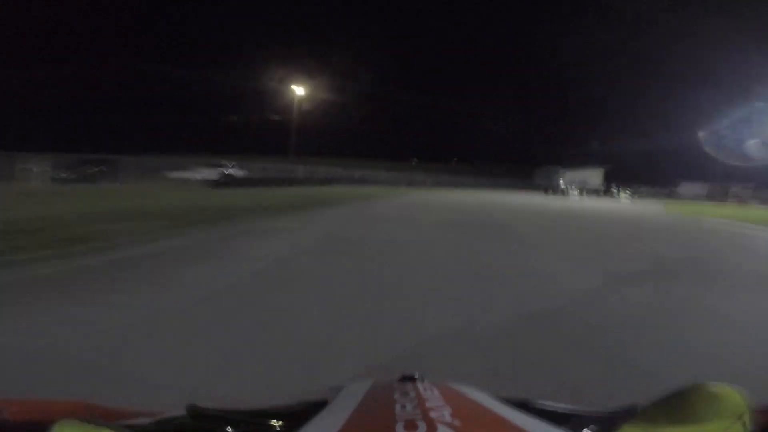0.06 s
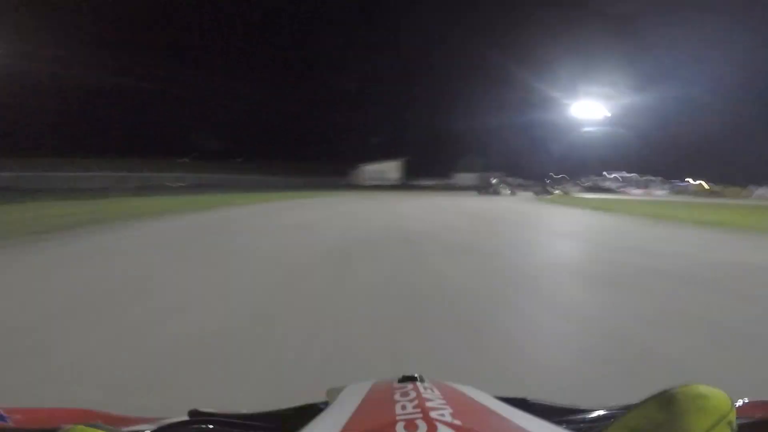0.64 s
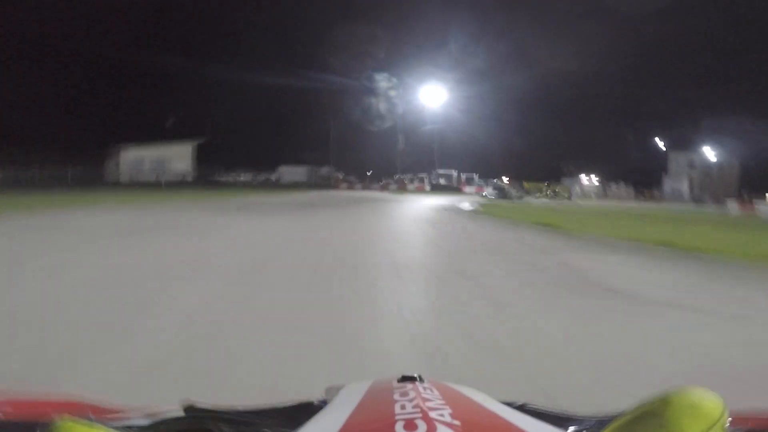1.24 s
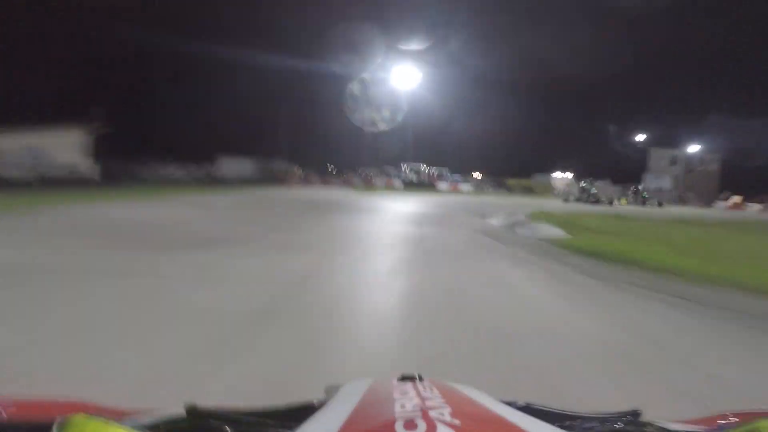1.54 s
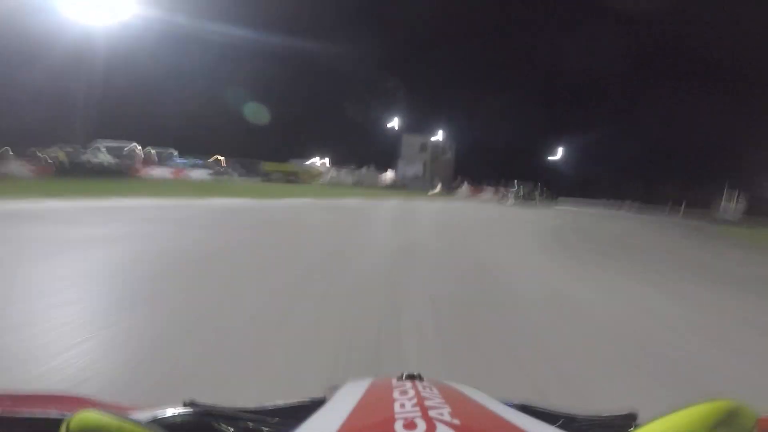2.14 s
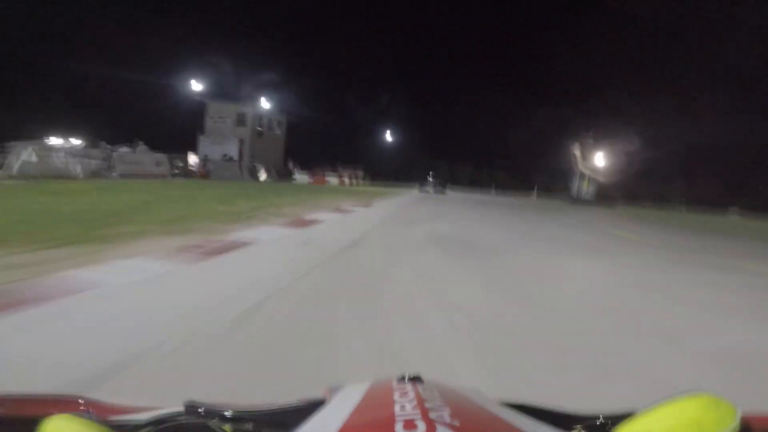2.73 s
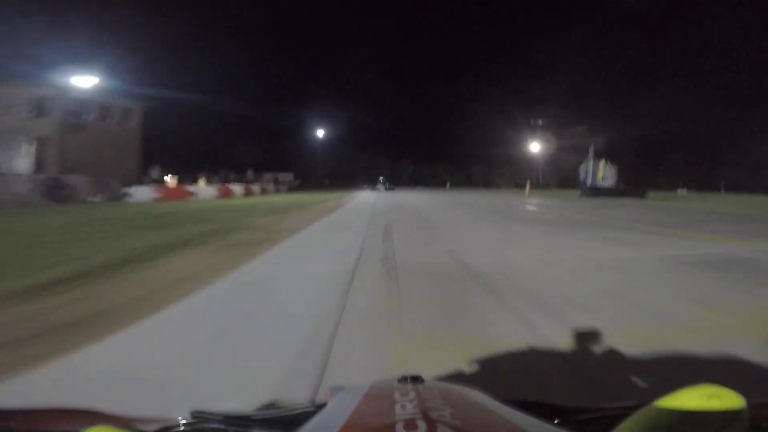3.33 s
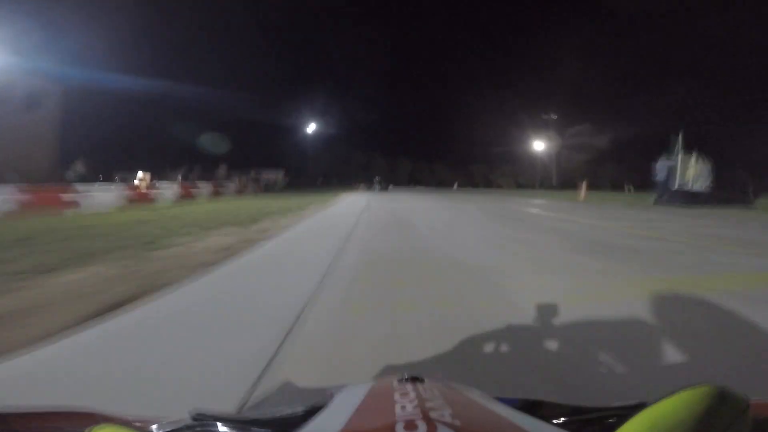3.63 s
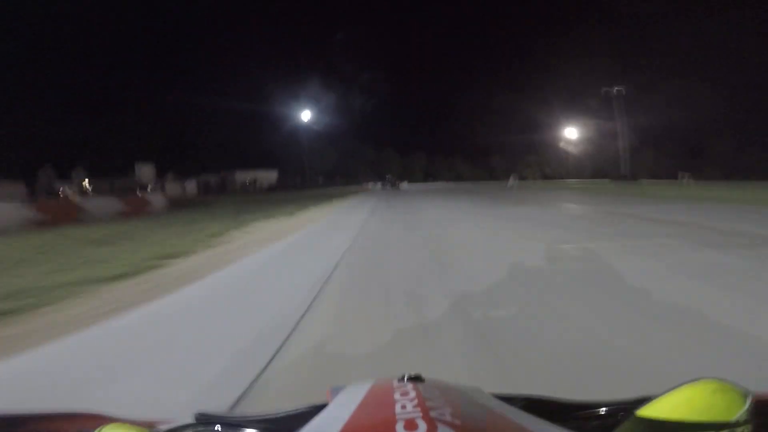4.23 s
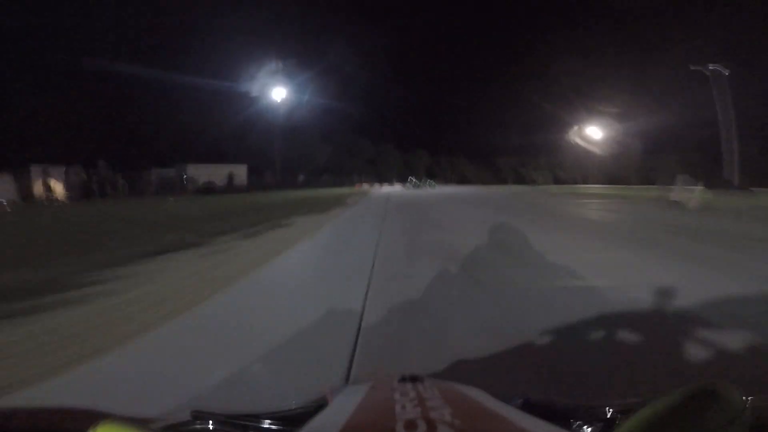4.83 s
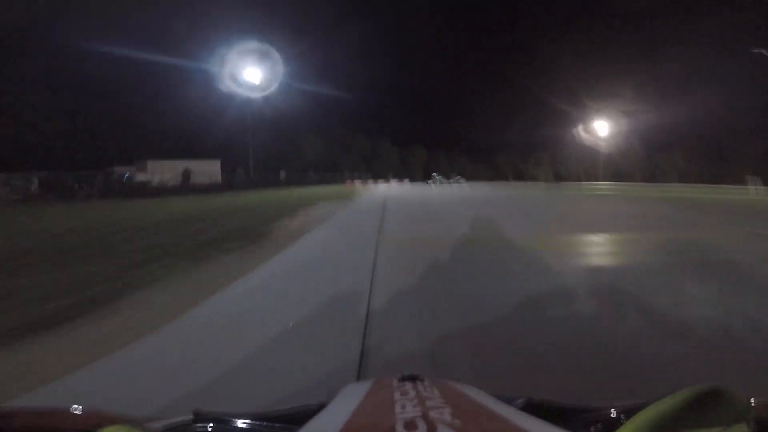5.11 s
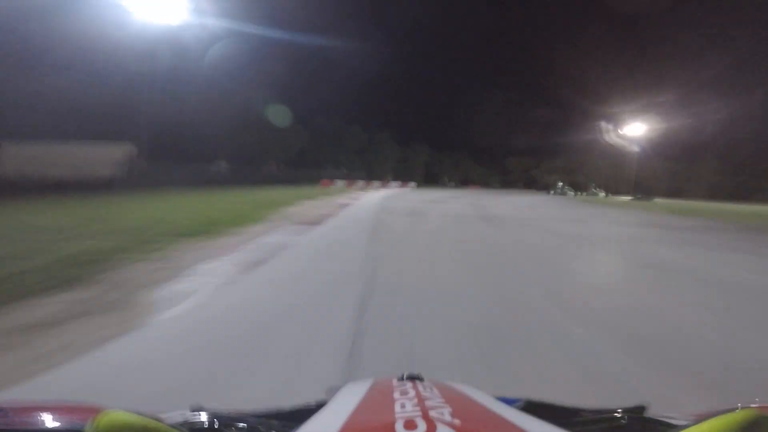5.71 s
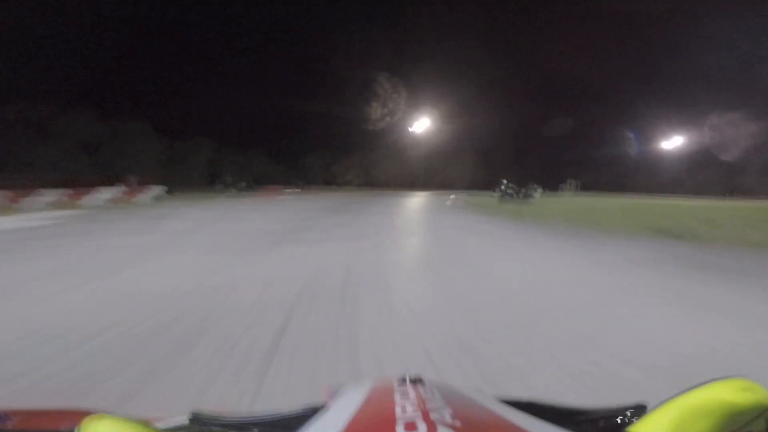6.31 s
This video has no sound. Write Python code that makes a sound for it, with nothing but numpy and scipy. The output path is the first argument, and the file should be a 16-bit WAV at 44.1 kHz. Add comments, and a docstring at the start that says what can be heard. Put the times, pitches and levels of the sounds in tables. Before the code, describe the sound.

A single-cylinder four-stroke racing kart is heard loud and close from on board, on an outdoor track. Its rough, pulsing drone sinks through a bend, with faint tyre scrub and a couple of thuds over a kerb. The engine then rises and grows louder down the straight before easing off briefly near the end. Loose bodywork knocks and clatters throughout, grit ticks, and wind buffets the microphone.

```python
"""The rough, pulsing drone of a single-cylinder four-stroke racing kart, heard from on board as it slows
through a bend, pulls hard down the straight and eases off. The exhaust fires every second crank turn and
the piston shakes the frame; clatter and hiss pulse with each firing and grow with speed and throttle.
Loose parts knock, grit ticks, the tyres scrub and squeak in the bends, the chassis booms on the asphalt,
and wind buffets the microphone."""
import sys
import numpy as np
from scipy import signal
from scipy.fft import rfft, irfft
from scipy.io import wavfile
from scipy.ndimage import uniform_filter1d, minimum_filter1d

SR = 44100
rng = np.random.default_rng(int(sys.argv[2]) if len(sys.argv) > 2 else 0)


def master(y):
    """Save y as 16-bit WAV."""
    cut = np.clip(np.atleast_2d(y).T, -1, 1)
    pcm = np.round(cut * 32767)  # scale
    wavfile.write(sys.argv[1], SR, pcm.astype(np.int16))


N = 289296
TIME = np.arange(N) / SR
FREQS = np.fft.rfftfreq(8192, 1 / SR)
BAND_EDGE_HZ = 14000


def gain_of(db):
    """Amplitude ratio of a level in decibels."""
    return 10 ** (np.asarray(db) / 20)


def unit_rms(x):
    """Normalisation to rms 1."""
    return x / np.sqrt(np.mean(x ** 2) + 1e-20)


def curve(table):
    """Linear interpolation of a time curve at every sample."""
    return np.interp(TIME, *np.transpose(table))


def spectrum(table):
    """Interpolation of levels in dB on a logarithmic frequency axis."""
    hz, db = np.transpose(table)
    return np.interp(np.log(FREQS + 1), np.log(hz + 1), db)


def resonance(hz, width_hz):
    """Lorentzian resonance curve of height 1."""
    return 1 / (1 + (2 * (FREQS - hz) / width_hz) ** 2)


def ring(x, db):
    """Convolution with the minimum-phase response of a body whose spectrum is db."""
    log_gain = np.log(gain_of(np.r_[db, db[-2:0:-1]]))
    response = np.fft.ifft(np.exp(np.conj(signal.hilbert(log_gain)))).real
    return signal.fftconvolve(x, response[:len(db)])[:len(x)]


def wander(rate_hz):
    """Random fluctuation: low-pass Gaussian noise of rms 1."""
    hz = np.fft.rfftfreq(N, 1 / SR)
    return unit_rms(irfft(rfft(rng.standard_normal(N)) * np.exp(-(hz / rate_hz) ** 2), N))


def add(mix, start_s, sound):
    """Superposition of a sound on the mix."""
    part = mix[max(round(start_s * SR), 0):][:len(sound)]
    part += sound[:len(part)]


def firing_swell(cycles, at, width, depth_db, uneven_db):
    """Amplitude modulation: a quick rise and slower fall per engine cycle; at and width are in cycles."""
    place = cycles - at + .5
    from_peak = place % 1 - .5
    bump = np.exp(-(from_peak / np.where(from_peak < 0, width / 2, width)) ** 2)
    strength_db = depth_db + uneven_db * np.clip(rng.standard_normal(int(place[-1]) + 2), -2, 2)
    return gain_of(bump * strength_db[place.astype(int)])


# Wind spectrum: f/Hz, relative level/dB
WIND_SPECTRUM = [(4, -23.5), (13, -9.5), (24, 1.5), (44, -1.5), (75, -1), (110, -8.5), (160, -11),
                 (300, -21), (700, -31), (2500, -87), (6000, -100)]
# Strength of the buffeting: t/s, relative level/dB
WIND_LEVEL = [(0, -15), (.75, -15.5), (1.2, -17), (1.75, -15.5), (2.55, -22.5), (3, -17.5), (3.8, -15.5),
              (4.7, -20.5), (5.6, -14.5), (6.56, -20)]
def wind(trim_db=1.96, lump_db=2.3):
    """Turbulence: eddies at the microphone give lumpy, low-frequency pressure fluctuations."""
    eddies = rng.standard_normal(N) * gain_of(lump_db * wander(33))
    return gain_of(curve(WIND_LEVEL) + trim_db) * unit_rms(ring(eddies, spectrum(WIND_SPECTRUM)))


# Chassis response: f/Hz, relative level/dB
CHASSIS_SPECTRUM = [(40, -42.5), (100, -2), (140, -4), (170, -5), (192, 0.5), (215, -2.5), (245, -16.5),
                    (450, -17), (1500, -56.5), (6000, -100)]
# Boom on the asphalt: t/s, level/dB
BOOM_LEVEL = [(0, -30), (.5, -20), (1.25, -21.5), (1.7, -31.5), (2, -20.5), (3, -22), (3.5, -28.5),
              (4.2, -24), (4.6, -20.5), (5.6, -22), (6.56, -17)]
# Jolts from the kerb and track joints: t/s, peak level/dB
KERB_JOLTS = [(1.83, -8), (1.904, -6), (2.03, -17)]
def chassis_boom(jolt_decay_s=0.014):
    """Base excitation: the unsprung chassis booms with the asphalt's grain and thuds over the kerb."""
    chassis_db = spectrum(CHASSIS_SPECTRUM)
    grain = rng.standard_normal(N) * gain_of(2 * wander(15))
    out = gain_of(curve(BOOM_LEVEL)) * unit_rms(ring(grain, chassis_db))
    t = TIME[:4096]
    thud_db = np.maximum(chassis_db, -5 - ((FREQS - 300) / 70) ** 2)  # a jolt also flexes the floor pan
    for start_s, peak_db in KERB_JOLTS:
        thud = ring(rng.standard_normal(len(t)) * np.exp(-t / jolt_decay_s), thud_db)
        add(out, start_s, gain_of(peak_db) * thud / abs(thud).max())
    return out


# Rasps in the bends: t/s, duration/s, centre f/Hz, level/dB
TYRE_SCRUBS = [(0, .38, 2100, -41.5), (0.503, 0.38, 2647, -43), (1.716, 0.63, 3300, -49),
               (5.819, 0.7, 3437, -40)]
def tyre_scrub(width_hz=550):
    """Sliding friction: rubber judders sideways and rasps in one band of noise."""
    out = np.zeros(N)
    for start_s, length_s, hz, db in TYRE_SCRUBS:
        n = int(length_s * SR)
        slips = rng.standard_normal(n) * gain_of(4 * wander(90)[:n])
        rasp = ring(slips, 20 * np.log10(resonance(hz, width_hz)))
        add(out, start_s, gain_of(db) * signal.windows.tukey(n, .5) * unit_rms(rasp))
    return out


# Squeaks in the bend: t/s, duration/s, start f/Hz, end f/Hz, relative level/dB, waver as a fraction of f
TYRE_SQUEAKS = [(0.427, 0.018, 1180, 1240, -30, .012), (1.445, 0.067, 2180, 2350, -44, .01),
                (1.609, 0.048, 2240, 2810, -39, 0.0083)]
def tyre_squeaks():
    """Stick-slip oscillation: rubber grips and lets go in a brief, wavering, rising whistle."""
    out = np.zeros(N)
    for start_s, length_s, start_hz, end_hz, db, waver in TYRE_SQUEAKS:
        n = int(length_s * SR)
        hz = np.linspace(start_hz, end_hz, n) * (1 + waver * wander(210)[:n])
        whistle = np.sin(2 * np.pi * np.cumsum(hz) / SR)
        add(out, start_s, 2 * gain_of(db) * signal.windows.tukey(n, .7) * whistle)
    return out


# Sharp ticks, as of grit flung at the bodywork: t/s, peak level/dB
GRIT_TICKS = [(1.1164, -23), (1.8342, -18), (1.934, -21), (2.409, -13), (3.3347, -19), (3.5867, -17),
              (3.7653, -23), (4.0954, -16), (4.376, -23), (4.5531, -11.5), (4.7743, -14), (4.9213, -30),
              (5.352, -8), (5.5642, -29), (5.689, -14), (5.9382, -28), (6.343, -25)]
def grit_ticks(decay_s=0.0007, dull_db=16):
    """Hard impact: a contact of a millisecond or two has a broad, bright spectrum."""
    out, t = np.zeros(N), TIME[:512]
    colour_db = spectrum(HISS_SPECTRUM) / 2 - dull_db * (FREQS / BAND_EDGE_HZ) ** 2
    for start_s, peak_db in GRIT_TICKS:
        tick = ring(rng.standard_normal(len(t)) * np.exp(-t / decay_s), colour_db)
        add(out, start_s, gain_of(peak_db) * tick / abs(tick).max())
    return out


# Broad response of the panels: f/Hz, relative level/dB
PANEL_SPECTRUM = [(150, -4.5), (400, 3), (600, 4.5), (860, -0.5), (1040, 4), (1400, 0.5), (1780, 1),
                  (1970, -6.5), (2350, -8), (3150, -7.5), (3900, -18.5), (5800, -26), (7000, -34),
                  (13000, -65)]
# Panel resonances: f/Hz, width/Hz, lift/dB
PANEL_RESONANCES = [(1747, 380, 3), (2164, 99, 4.5), (2690, 220, 4)]
def bodywork_db():
    """Modal response: resonance peaks stand on the broad spectrum of the panels."""
    return spectrum(PANEL_SPECTRUM) + sum(db * resonance(hz, width) for hz, width, db in PANEL_RESONANCES)


# Knocks of loose parts: t/s, relative level/dB, relative treble level/dB, ringing f/Hz
LOOSE_KNOCKS = [(0.0912, -15.5, -17, 1590), (0.1286, -21, -24, 844), (0.2602, -19.5, -13, 2980),
                (0.445, -26, -43, 1210), (0.621, -13.5, -18, 2340), (0.7009, -19.5, -6, 1850),
                (0.7428, -18.5, -29, 2730), (0.8208, -21, -15, 1770), (0.8583, -17.5, -17, 955),
                (0.9664, -21, -4, 1020), (1.0163, -19, -11, 2823), (1.0515, -23, -32, 1800),
                (1.1165, -23, -8, 3490), (1.2959, -24.5, -17, 951), (1.5255, -18.5, -12, 1339),
                (1.567, -21, -11, 940), (1.8232, -21, -14, 1210), (1.844, -20, -9, 1540),
                (1.908, -17.5, -13, 1560), (1.9349, -23.5, -13, 1660), (2.0333, -21.5, -6.5, 2030),
                (2.0518, -21, -19, 1490), (2.084, -26.5, -7, 3090), (2.116, -23.0, -12, 1468),
                (2.205, -22.5, -17, 3130), (2.2392, -19, -10, 955), (2.361, -19.5, -15, 3073),
                (2.508, -23, -14, 880), (2.557, -20, -11, 1210), (2.6784, -20.5, -24, 1600),
                (2.9295, -22, -26, 1357), (3.0934, -20.5, -8, 1575), (3.1992, -18, -19, 3000),
                (3.243, -21.5, -13, 1100), (3.2685, -20.5, -6, 1958), (3.3328, -20, -10, 1530),
                (3.5873, -17.5, -10, 1600), (3.6346, -18.0, -6.5, 945.7), (3.742, -20, -9, 1905),
                (3.7642, -19, -16, 1480), (3.8875, -18.5, -5, 1141), (3.9086, -17.5, -8, 1830),
                (3.9881, -20, -41, 1092), (4.1332, -13.5, -7.5, 910), (4.1688, -23, -24, 1750),
                (4.2589, -30, -3, 1110), (4.2713, -17, -19, 948), (4.3, -22, -2, 1470),
                (4.3876, -15, -13, 1640), (4.5037, -19, -20, 2480), (4.6405, -13, -11, 1684),
                (4.8948, -17, -18, 3027), (4.9215, -23, 0, 3070), (4.9995, -22, 0, 1348),
                (5.0119, -16.5, -7, 1730), (5.0676, -15, -29, 1822), (5.1001, -19, -10, 3033),
                (5.1584, -11.5, -14, 1753), (5.1654, -18, -16, 1785), (5.246, -11, -20, 1496),
                (5.29, -18.0, -4, 2900), (5.5655, -16.5, -9, 1721), (5.718, -9, -16, 1920),
                (5.9063, -16, -10, 1420), (5.9386, -20, -14, 2920), (6.0364, -15, -14, 1400),
                (6.1544, -20, -28, 1740), (6.4312, -10.5, -18, 3234), (6.47, -14, -13, 2084),
                (6.5393, -13, -8.5, 1450)]
def knocks(trim_db=-8, crack_s=0.00069, scuff_s=0.0098, rebound_s=0.004, lead_s=0.016):
    """Impact and rebound: a loose part scuffs, strikes and bounces; hard knocks are drier, brighter."""
    out, t = np.zeros(N), TIME[:2048] - lead_s
    age = np.maximum([t, t - rebound_s], 0) / crack_s
    crack, rebound = age * np.exp(1 - age)
    scuff = np.exp(-abs(t - crack_s) / scuff_s)
    treble_shelf = 1 / (1 + (3600 / (FREQS + 1)) ** 8)
    panel_db = bodywork_db() - 7 / (1 + (FREQS / 800) ** 2) + 11 * FREQS / BAND_EDGE_HZ
    for strike_s, db, treble_db, hz in LOOSE_KNOCKS:
        hardness_db = treble_db + 15  # zero for a typical knock
        envelope = crack + gain_of(-10) * rebound + gain_of(-14 - 0.25 * hardness_db) * scuff
        colour_db = panel_db + 7 * resonance(hz, width_hz=600) + treble_shelf * (hardness_db + 3)
        knock = ring(envelope * rng.standard_normal(len(t)), colour_db)
        add(out, strike_s - lead_s, gain_of(db + trim_db) * unit_rms(knock))
    return out


def clatter(cycles, level_db, taps_per_s=3000, clacks_per_s=220, clack_db=-4):
    """Shot noise: dense taps and sparser hard clacks ring the panels, most strongly after each firing."""
    taps = rng.standard_normal(N) * (rng.random(N) < taps_per_s / SR)
    taps *= firing_swell(cycles, at=0.12, width=0.21, depth_db=3.5, uneven_db=1.5)
    taps *= gain_of(1.2 * wander(93))
    bunching = firing_swell(cycles, at=0.14, width=0.2, depth_db=13, uneven_db=0)
    struck = rng.random(N) < clacks_per_s / SR * bunching / bunching.mean()
    clacks = struck * rng.choice([-1, 1], N) * rng.uniform(0.96, 1, N)
    blows = unit_rms(taps) + gain_of(clack_db) * unit_rms(clacks)
    return gain_of(level_db) * unit_rms(ring(blows, bodywork_db()))


# Spectrum of the mechanical hiss: f/Hz, relative level/dB
HISS_SPECTRUM = [(1500, -13), (3000, -3.5), (3900, -4), (4700, 3), (6000, 4), (6700, -4.5), (8100, -8),
                 (9200, -16), (10700, -22.5), (12000, -35), (14000, -35)]
def engine_hiss(cycles, throttle, level_db, spit_db=-8, throttle_db=14):
    """Modulated noise: mechanical fizz pulses with the firings, which spit brighter under load."""
    fizz = rng.standard_normal(N) * firing_swell(cycles, at=0.2, width=0.17, depth_db=7, uneven_db=2.5)
    spit = rng.standard_normal(N) * firing_swell(cycles, at=.177, width=.075, depth_db=13.5, uneven_db=4)
    hiss_db = spectrum(HISS_SPECTRUM)
    bright = unit_rms(ring(spit, hiss_db - 16 / (1 + (FREQS / 7500) ** 4)))
    body = unit_rms(ring(fizz * gain_of(2 * wander(200)), hiss_db - 4 * (FREQS / 9000) ** 2))
    return gain_of(level_db) * (body + bright * gain_of(spit_db + throttle_db * (throttle - 0.65)))


# Vibration of the frame: t/s, relative level/dB
SHAKE_LEVEL = [(.05, -21.5), (.35, -26.5), (.8, -22), (1.45, -19.5), (1.85, -25.5), (2.45, -17.5),
               (3, -19.5), (3.5, -23.5), (4.6, -24.5), (5.05, -26.5), (5.8, -20.5), (6.3, -37)]
def frame_shake(cycles, first_db=5, second_db=-1.5, sway_turns=0.027):
    """Reciprocating unbalance: the piston shakes the frame once and twice per crank turn."""
    angle = 2 * np.pi * (2 * cycles + sway_turns * wander(14))  # the microphone sways on its mount
    first = gain_of(first_db + 0.53 * wander(53)) * np.cos(angle - 1.2)
    second = gain_of(second_db + 1.8 * wander(26)) * np.cos(2 * angle)
    return np.sqrt(2) * gain_of(curve(SHAKE_LEVEL)) * (first + second)


# Partials of the firing note: multiple of the crank frequency, level/dB before the pipe
ENGINE_ORDERS = [(.5, 10), (1.5, 3.5), (2.5, -1), (3, -2), (3.5, -4), (4, -3.5), (4.5, -2), (5, -0.5),
                 (5.5, -2), (6, 0.5), (6.5, -6.5), (7, -3), (7.5, -4.5), (8, -13)]
# Response of the exhaust pipe: f/Hz, relative level/dB
PIPE_SPECTRUM = [(30, -9), (70, -11), (95, -0.5), (140, -12), (185, 2), (228, -0.5), (255, -3.5),
                 (290, -0.5), (330, -9.5), (380, -12), (460, -20), (700, -21.5), (1500, -78.5),
                 (6000, -100)]
# Strength of the exhaust: t/s, relative level/dB
PIPE_LEVEL = [(0, -20), (.55, -15), (1.3, -17.5), (1.75, -30), (1.95, -23.5), (2.5, -21.5), (3.2, -19.5),
              (3.9, -15), (4.6, -13.5), (5.15, -11.5), (5.8, -9.5), (6.1, -16), (6.5, -9.5)]
def exhaust(cycles, throttle, trim_db=-1.4, uneven_db=2, jitter_cycles=0.0052):
    """Source and filter: the pipe shapes the firing harmonics and a near-steady rush of turbulent gas."""
    crank_angle = 4 * np.pi * (cycles + jitter_cycles * wander(30))
    note = np.zeros(N)
    for order, db in ENGINE_ORDERS:
        amplitude = gain_of(db + uneven_db * wander(6.1))
        note += amplitude * np.cos(order * crank_angle + 2 * np.pi * rng.random())
    gas_rush = rng.standard_normal(N)
    gas_rush *= firing_swell(cycles, at=0.15, width=0.13, depth_db=-1.5, uneven_db=1.5)  # a slight dip
    tonal = 0.6 + 0.32 * throttle  # an open throttle firms up the note
    pipe_db = spectrum(PIPE_SPECTRUM)
    note, gas_rush = unit_rms(ring(note, pipe_db)), unit_rms(ring(gas_rush, pipe_db))
    return gain_of(curve(PIPE_LEVEL) + trim_db) * (tonal * note + np.sqrt(1 - tonal ** 2) * gas_rush)


def load_level(crank_hz, throttle, full_db, octave_db, shut_db, cruise_hz=70):
    """Power law in speed: full_db at cruise, octave_db per doubling, shut_db more at closed throttle."""
    return full_db + octave_db * np.log2(crank_hz / cruise_hz) + shut_db * (1 - throttle)


# Rotation of the crank: t/s, f/Hz
CRANK_SPEED = [(0, 71.44), (.2, 72.53), (.6, 70.6), (1, 67.68), (1.2, 65.35), (1.6, 63.62), (2, 63.12),
               (2.5, 59.87), (2.8, 57.97), (3, 58.86), (3.75, 62.73), (4, 65.94), (4.75, 71.45), (5, 74.51),
               (5.75, 79.7), (6.56, 75.1)]
# Throttle: t/s, opening from 0 to 1
THROTTLE_OPENING = [(0, 0.57), (.15, 0.66), (.35, 0.22), (.55, 0.73), (.78, 0.9), (1.4, 0.85), (1.72, 0.36),
                    (1.92, 0.62), (2.2, 0.61), (2.55, 0.92), (3.1, 0.88), (3.85, 0.98), (4.9, 0.86),
                    (5.7, 0.9), (5.9, 0.54), (6.08, 0.2), (6.22, 0.85), (6.56, 0.75)]
def scene():
    """Superposition: engine sounds locked to one crank add to knocks, track noise and wind."""
    crank_hz, throttle = curve(CRANK_SPEED), curve(THROTTLE_OPENING)
    cycles = np.cumsum(crank_hz) / SR / 2  # a four-stroke cycle takes two turns
    clatter_db = load_level(crank_hz, throttle, full_db=-22.5, octave_db=15, shut_db=-11.5)
    hiss_db = load_level(crank_hz, throttle, full_db=-38, octave_db=8.5, shut_db=-11)
    engine = frame_shake(cycles) + exhaust(cycles, throttle) + engine_hiss(cycles, throttle, hiss_db)
    body = clatter(cycles, clatter_db) + knocks()
    track = grit_ticks() + chassis_boom() + tyre_squeaks() + tyre_scrub()
    return (engine + body + track + wind())[None]


def record(dry, knee_db=-2.5, recover_db_per_s=200, input_db=1):
    """Peak limiting: a fast gain cut presses the peaks down, then a low-pass filter limits the band."""
    x = dry[0] * gain_of(input_db)
    needed_cut_db = 0.8 * np.maximum(20 * np.log10(abs(x) + 1e-9) - knee_db, 0)  # ratio 5:1
    recovery_db = TIME * recover_db_per_s
    gain_db = recovery_db - np.maximum.accumulate(needed_cut_db + recovery_db)
    smooth_db = uniform_filter1d(minimum_filter1d(gain_db, size=90), size=90)
    lowpass = signal.firwin(255, BAND_EDGE_HZ, window=("kaiser", 9), fs=SR)
    return signal.oaconvolve(x * gain_of(smooth_db), lowpass, "same")[None]


dry = scene()
out = record(dry)
master(out)
```